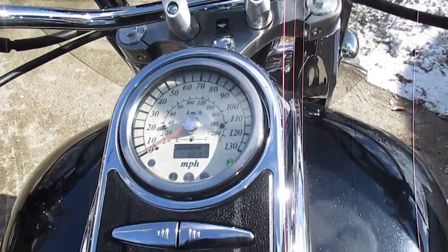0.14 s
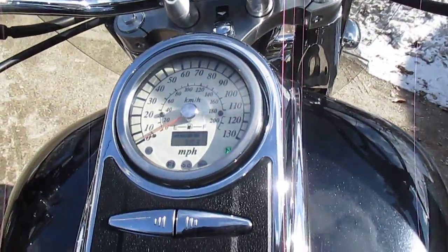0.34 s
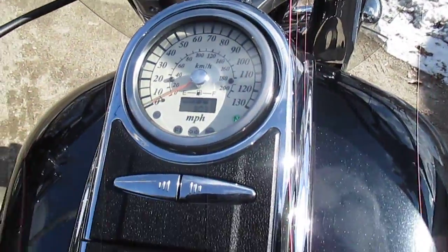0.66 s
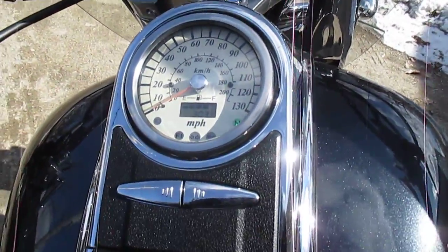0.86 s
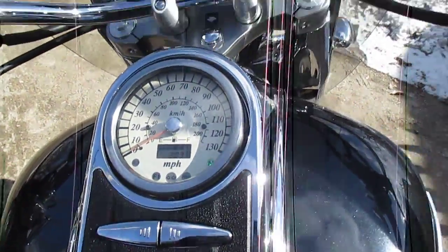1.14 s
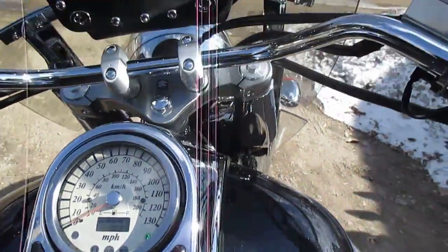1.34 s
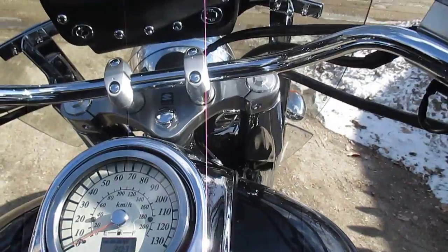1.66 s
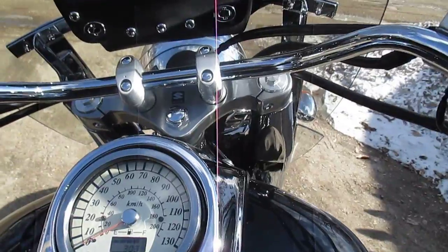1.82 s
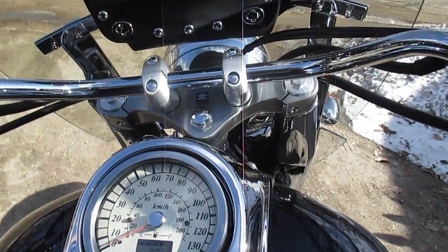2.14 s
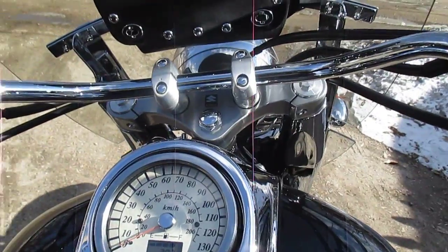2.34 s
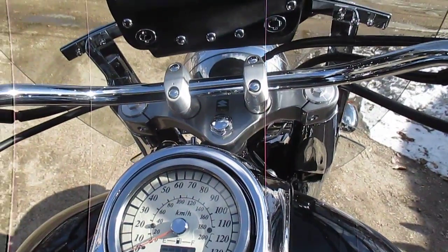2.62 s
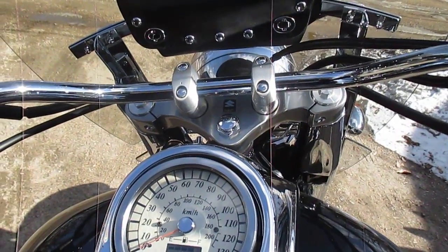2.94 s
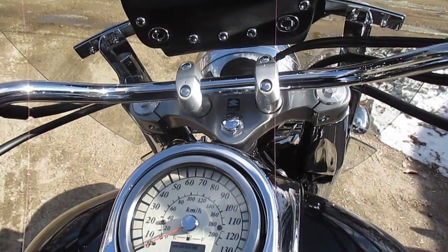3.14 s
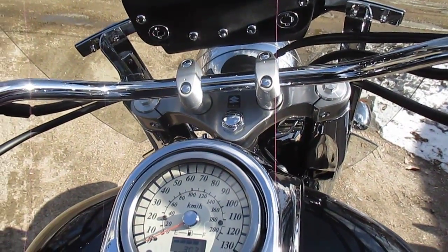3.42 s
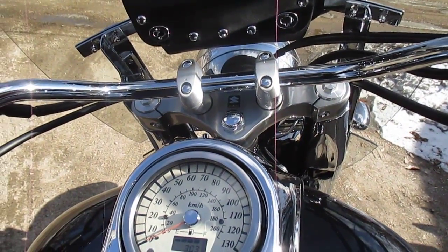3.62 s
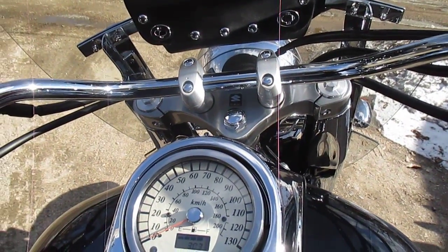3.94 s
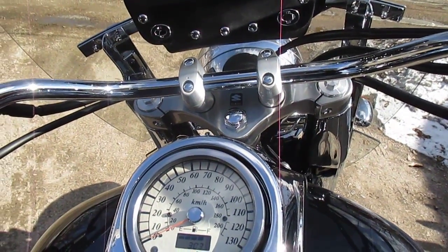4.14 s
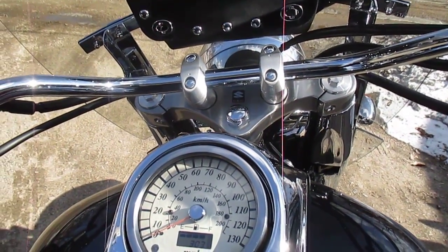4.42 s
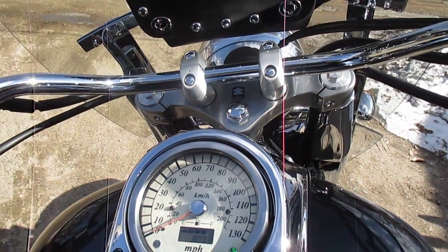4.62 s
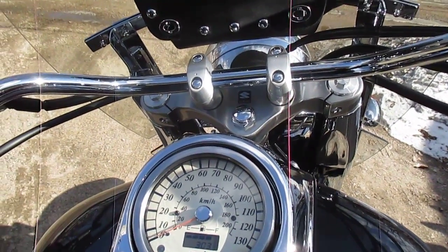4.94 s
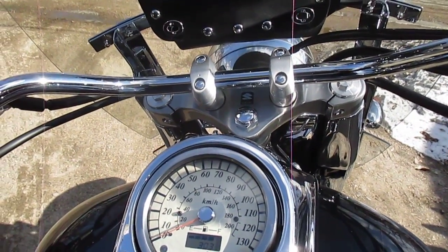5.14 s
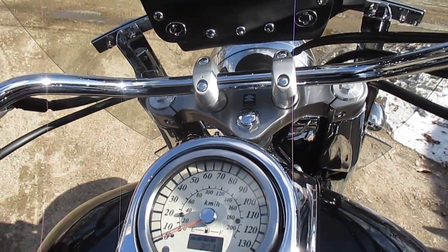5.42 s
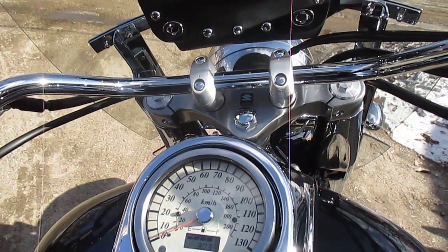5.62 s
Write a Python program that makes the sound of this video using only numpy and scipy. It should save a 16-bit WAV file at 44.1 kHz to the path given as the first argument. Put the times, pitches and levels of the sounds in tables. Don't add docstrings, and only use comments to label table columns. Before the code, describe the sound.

Close, lumpy motorcycle idle with ticking valves, broken by a throttle blip near two seconds and two more blips after four.

```python
import sys
import numpy as np
from scipy import signal
from scipy.io import wavfile
from scipy.ndimage import uniform_filter1d

SR = 44100
rng = np.random.default_rng(int(sys.argv[2]) if len(sys.argv) > 2 else 0)


def inscribe(sig):
    pcm = np.round(np.clip(np.atleast_2d(sig).T, -1, 1) * 32767)
    wavfile.write(sys.argv[1], SR, pcm.astype(np.int16))


def boost_factor(decibels):
    exponent = np.asarray(decibels, float) / 20
    return 10 ** exponent


N = 254891

# start_s, cycles_turned at a rear firing, racing (1 = races up to the next row)
CRANK_TURNS = [(-0.0732, -1, 0), (0.2379, 2, 0), (0.8886, 8, 0), (1.9419, 18, 0), (2.047, 19, 1),
               (2.6335, 26, 0), (3.1185, 30, 0), (3.566, 34, 0), (4.0013, 38, 0), (4.4174, 42, 0),
               (4.501, 43, 1), (5.11, 50, 0), (5.229, 51, 1), (5.749, 57, 0), (5.97, 59, 0)]
RACE_CYCLE_MS = [
    71,
    62,
    63,
    72,
    95,
    119,
    115,
]
RACE_LATENESS_MS = [8, 20, 26, 28, 21, 0, 0]
RACE_FRONT_LEVEL_DB = [-13.5, 2.5, -0.5, -2.5, 2.5, -5, 0.5]
RACE_REAR_LEVEL_DB = [-8, 3.5, 3, 2, -3.5, 3.7, -1]
# delay_ms, level_db, half_width_ms
PIPE_ECHOES = [
    [(-0.0, 13.5, 2.2), (5.1, 6.4, 1.4), (15.5, 15.5, 3.0), (25.7, 13.5, 3.0), (31.6, -0.3, 1.0),
     (44.7, -0.7, 1.9), (58.4, 5.4, 4.1), (69.6, 2.0, 4.5)],
    [(0.7, 15.6, 1.8), (6.2, 6.0, 1.8), (15.5, 12.9, 3.1), (26.3, 8.7, 2.0), (32.5, 0.2, 1.3),
     (44.8, 12.3, 5.0), (58.4, 10.3, 5.0), (72.5, 3.6, 2.3)],
    [(0, 12.5, 1.55), (13, 6.5, 2.0)],
]
# delay_ms, level_db, half_width_ms
CHUFF_ECHOES = [
    (0.3, 12.5, 1.96),
    (13.5, 5.5, 2.1),
    (41.8, 2, 4.1),
    (55.3, 2, 2.9),
]
# start_s, level_db
PIPE_POPS = [(2.065, -16), (2.087, -16), (2.101, -33), (2.115, -6), (2.126, -23), (2.21, -17),
             (4.445, -14.5), (4.486, -21), (4.501, -41), (4.518, -15), (4.555, -37), (4.569, -9.5),
             (4.58, -20), (4.591, -3.5), (5.193, -9.5), (5.229, -16), (5.293, -7), (5.305, -11.5),
             (5.317, -10), (5.347, -10)]
# pitch_hz, level_db (per Hz)
CASE_COLOUR = [(130, -29), (220, -4.5), (314, -9), (540, -5.5), (880, -9.5), (1130, -14), (1300, -7.5),
               (2100, -10.5), (2350, -17), (3200, -22.5), (3800, -20.5), (4700, -26.5), (10900, -36),
               (15500, -52)]
# pitch_hz, width_hz, level_db
COVER_TONES = [(360, 30, -6), (441, 22, -3), (530, 40, 0), (705, 30, -2), (980, 45, -5), (1235, 22, -3),
               (1380, 20, -4), (1535, 35, -3), (1675, 30, -4), (1912, 35, -3), (2010, 45, -4),
               (2133, 40, -8), (2900, 100, -18), (3550, 160, -16), (3930, 160, -16), (5620, 250, -18)]
# pitch_hz, level_db (per Hz)
TICK_COLOUR = [(2500, -38), (3800, -4), (5000, -0.5), (5600, 3), (6400, -6.5), (10000, -10), (12500, -19),
               (15500, -30)]
# open_s, shut_s, hiss_db, duck_db (gain control afterwards), sizzle_db (extra at the top)
THROTTLE_SNAPS = [
    (1.96, 2.135, -42, -10.5, -5),
    (4.405, 4.593, -42.5, -7.5, 2),
    (5.154, 5.335, -45, -8, -8),
]
HISS_SWELLS_DB = [-3, -2.5, -9]
# pitch_hz, level_db (per Hz)
HISS_COLOUR = [(1400, -30), (2400, -3), (3000, -4), (4400, -11), (5700, -9), (7500, -13), (9600, -12),
               (12000, -17), (15500, -26)]
# start_s, length_ms, roar_db, whistle_db, whistle_hz
AIR_GULPS = [(2.019, 13, -13, -21.5, 1890), (2.049, 12, -22, -45, 1900), (2.078, 65, -12.5, -30, 1810),
             (4.454, 26, -17, -30, 1790), (4.486, 19, -13.5, -29, 1690), (4.547, 58, -11.5, -28, 1940),
             (5.17, 17, -17.5, -40.5, 1580), (5.201, 30, -11.5, -18, 2060), (5.256, 49, -14, -24, 1770),
             (2.419, 18, -20, -52, 1600), (4.769, 68, -24.5, -45, 1600), (4.89, 35, -21, -56, 1600),
             (5.52, 22, -17.5, -45, 1600)]

IDLE_CYCLE_S = 0.11


def read(points, hz):
    f, value = np.transpose(points)
    return np.interp(np.log(hz + 1), np.log(f + 1), value)


def evened(x):
    return x / np.sqrt(np.mean(x ** 2) + 1e-20)


def noise(points, patchy_db):
    hz = np.fft.rfftfreq(512, 1 / SR)
    real, imaginary, patches = rng.standard_normal((N // 128 + 5, 257, 3)).T
    patches = uniform_filter1d(patches, size=5, axis=0)
    patches = evened(uniform_filter1d(patches, size=10, axis=1))
    spectra = (real + 1j * imaginary) * boost_factor(read(points, hz)[:, None] + patchy_db * patches)
    return evened(signal.istft(spectra, nperseg=512, noverlap=384)[1][:N])


def band(x, lo_hz, hi_hz, order):
    return signal.sosfilt(signal.butter(order, [lo_hz, hi_hz], "bandpass", fs=SR, output="sos"), x)


def train(s, size):
    inside = s >= 0
    return np.bincount((s[inside] * SR).astype(int), size[inside], N + SR // 8)


def burst(clicks, rise_ms, fall_ms):
    ms = np.arange(SR // 10) * 1000 / SR
    swell = (1 - np.exp(-ms / rise_ms)) * np.exp(-ms / fall_ms)
    return signal.oaconvolve(clicks, swell)[:N]


def crank():
    rear, rows = [np.array(CRANK_TURNS[0][:1])], [np.zeros((3, 1))]
    curves = (RACE_CYCLE_MS, RACE_LATENESS_MS, RACE_FRONT_LEVEL_DB, RACE_REAR_LEVEL_DB)
    for (start, turned, racing), (end, later, _) in zip(CRANK_TURNS, CRANK_TURNS[1:]):
        stage = np.linspace(0, len(RACE_CYCLE_MS) - 1, later - turned)
        ms, *race = (np.interp(stage, np.arange(len(RACE_CYCLE_MS)), curve) for curve in curves)
        lengths = ms if racing else np.ones(later - turned)
        rear.append(start + (end - start) * np.cumsum(lengths) / lengths.sum())
        rows.append(racing * np.array(race))
    return np.concatenate(rear), *np.hstack(rows)


def at_angle(rear, share):
    cycle = np.arange(len(rear))
    return np.interp(cycle[1:-1] + share, cycle, rear)


def speed(rear):
    return np.interp(np.arange(N) / SR, .5 * (rear[1:] + rear[:-1]), IDLE_CYCLE_S / np.diff(rear))


def firings(rear, late_ms, front_db, rear_db):
    front_lead, firing_db = .349, -13
    sag_slope = 3.5
    waver_db = .6 * rng.standard_normal((len(rear) - 2, 2)).T
    pop_s, pop_db = np.transpose(PIPE_POPS)
    blown = rear + late_ms / 1000
    chuffs = late_ms[1:-1] > 12
    s = np.concatenate([at_angle(blown, -front_lead), blown[1:-1], pop_s])
    slowness = np.minimum(IDLE_CYCLE_S / np.diff(rear)[:-1], 1)
    base_db = firing_db + sag_slope * 20 * np.log10(slowness)
    front_level = base_db + front_db[1:-1] + waver_db[0]
    rear_level = base_db + rear_db[1:-1] + waver_db[1]
    db = np.concatenate([front_level, rear_level, pop_db])
    kind = np.concatenate([np.where(chuffs, 3, 0), np.where(chuffs, 3, 1), np.full(len(PIPE_POPS), 2)])
    return s, db, kind


def exhaust(s, db, kind, pace):
    rumble_db, overrun_db, overrun_span = -30, 8, .2
    ms = np.arange(SR // 8) * 1000 / SR - 10
    out = np.zeros(N)
    for k, pipe in enumerate(PIPE_ECHOES + [CHUFF_ECHOES]):
        pulse = -sum(boost_factor(level) * np.exp(-.5 * ((ms - delay) / width) ** 2) for delay, level, width in pipe)
        pulse = signal.lfilter(*signal.butter(1, 61.4, "high", fs=SR), pulse)
        clicks = train(s + .1, boost_factor(db) * (kind == k))
        out += signal.oaconvolve(clicks, pulse)[round(.11 * SR):][:N]
    gas = evened(band(rng.standard_normal(N), 32.0, 170.0, order=2))
    out += boost_factor(-10.0) * band(out, 151.0, 168.0, order=1)
    unburnt = np.maximum(throttle().max(axis=0), np.clip((pace - 1.04) / overrun_span, 0, 1))
    return out + gas * boost_factor(rumble_db + overrun_db * unburnt)


def cover_rings():
    strength = boost_factor(3.4 * np.minimum(rng.exponential(1, N), 4))
    knocks = rng.standard_normal(N) * strength * (rng.random(N) < 1200 / SR)
    rings = 0
    for hz, width, db in COVER_TONES:
        r = np.exp(-np.pi * width / SR)
        soft = band(knocks, .85 * hz, 1.12 * hz, order=1)
        ring = signal.lfilter([1, 0, -1], [1, -2 * r * np.cos(2 * np.pi * hz / SR), r * r], soft)
        rings += boost_factor(db) * evened(ring)
    return evened(rings)


def clatter(rear, pace):
    clatter_db, speed_slope = -31, 0.51
    seated = np.concatenate([at_angle(rear, -.16), at_angle(rear, .255)])
    size, late = rng.standard_normal((len(seated), 2)).T
    harder_db = 1.4 * np.repeat([-.5, .5], len(rear) - 2)
    valves = burst(train(seated + .001 * late, boost_factor(.8 * size + harder_db)), 7.0, 6.0)
    pushrod = burst(train(at_angle(rear, 0.49), boost_factor(0.99 * late[:len(rear) - 2])), 1.0, 3.0)
    body = noise(CASE_COLOUR, 1.55) * (1 + 1.28 * valves)
    body += boost_factor(-2.0) * cover_rings() * (1 + 1.8 * valves)
    ticks = boost_factor(1.0) * noise(TICK_COLOUR, 0.6) * valves
    knock = boost_factor(8.5) * evened(band(rng.standard_normal(N), 360.0, 750.0, order=2)) * pushrod
    return boost_factor(clatter_db) * pace ** speed_slope * (body + ticks + knock)


def throttle():
    open_time_s, shut_time_s = 0.044, 0.027
    opens, shuts = np.transpose(THROTTLE_SNAPS)[:2, :, None]
    t = np.arange(N) / SR
    return np.clip(np.minimum((t - opens) / open_time_s, 1 + (shuts - t) / shut_time_s), 0, 1)


def gulps():
    strokes, out = np.zeros((2, N))
    ms = np.arange(SR // 5) * 1000 / SR
    for s, length_ms, roar_db, whistle_db, hz in AIR_GULPS:
        air = rng.standard_normal((SR // 5, 2)).T
        fade = np.exp(-.5 * ms / length_ms - np.maximum(ms - length_ms, 0) / 15.0)
        flow = np.minimum(ms / 2.2, 1) * fade
        box = band(air[0], 100.0, 820.0, order=2) + boost_factor(9.0) * band(air[0], 93.0, 356.0, order=2)
        roar = boost_factor(roar_db) * evened(box)
        whistle = boost_factor(whistle_db) * evened(band(air[1], .84 * hz, 1.16 * hz, order=2))
        out[round(s * SR):][:len(ms)] += flow * (roar + whistle)
        strokes[round(s * SR):][:len(ms)] += flow * (length_ms > 17)
    return out, strokes


def intake(pace):
    leak_db, sizzle_hz, flutter_db = -40, 11600, 2.5
    t = np.arange(N) / SR
    out, strokes = gulps()
    flutter = evened(band(rng.standard_normal(N), 11.0, 38.0, order=1))
    hiss = noise(HISS_COLOUR, 1.9) * boost_factor(flutter_db * flutter)
    sizzle = signal.sosfiltfilt(signal.butter(2, sizzle_hz, "high", fs=SR, output="sos"), hiss)
    out += boost_factor(leak_db) * np.maximum(pace - 1.05, 0) * hiss
    for opening, snap, swell_db in zip(throttle(), THROTTLE_SNAPS, HISS_SWELLS_DB):
        opens, shuts, hiss_db, _, sizzle_db = snap
        swelling_db = swell_db * np.interp(t, [opens, shuts], [-1, 1])
        level = opening * boost_factor(hiss_db + swelling_db) * (1 + 0.68 * strokes)
        out += level * (hiss + (boost_factor(sizzle_db) - 1) * sizzle)
    return out


def gain_control():
    duck_s, recover_db_per_s = 0.028, 6
    shuts, duck_db = np.transpose(THROTTLE_SNAPS)[[1, 3], :, None]
    since = np.arange(N) / SR - shuts
    recovering_db = np.minimum(duck_db + recover_db_per_s * since, 0)
    ducked_db = np.where(since > 0, recovering_db, 0).min(axis=0)
    return boost_factor(uniform_filter1d(ducked_db, round(duck_s * SR)))


def scene():
    rear, *cycles = crank()
    pace = speed(rear)
    pipes = exhaust(*firings(rear, *cycles), pace)
    return (pipes + clatter(rear, pace) + intake(pace))[None]


def top_cut(x):
    return signal.sosfilt(signal.butter(12, 15640, fs=SR, output="sos"), x)


def record(dry):
    ducked = dry * gain_control()
    soft = ducked / (1 + abs(ducked) ** 8) ** (1 / 8)
    return top_cut(soft)


dry = scene()
out = record(dry)
inscribe(out)
```